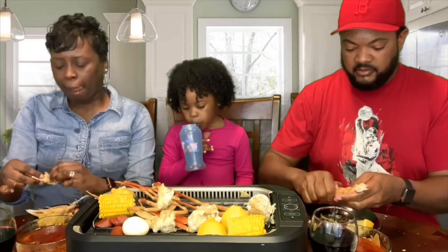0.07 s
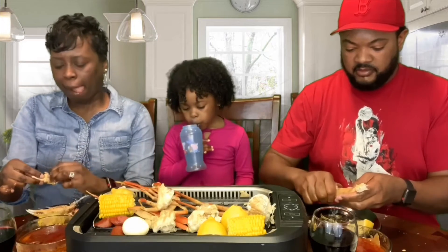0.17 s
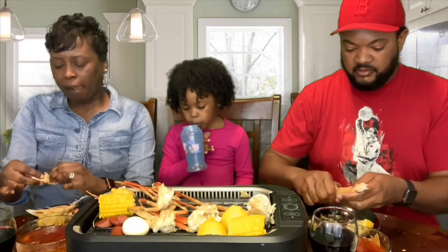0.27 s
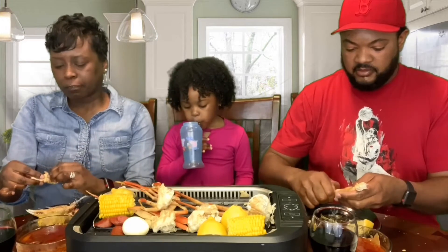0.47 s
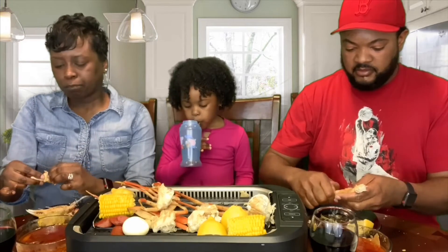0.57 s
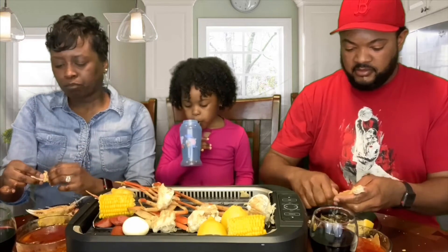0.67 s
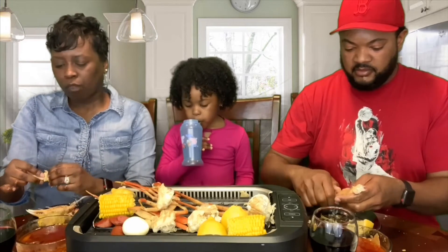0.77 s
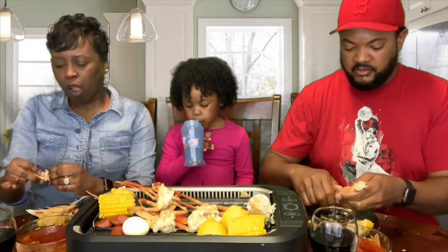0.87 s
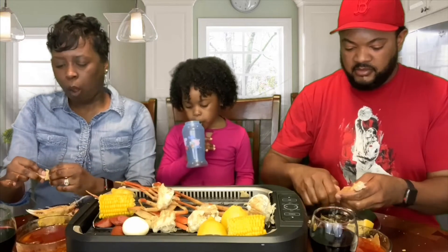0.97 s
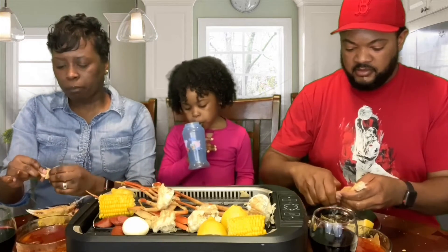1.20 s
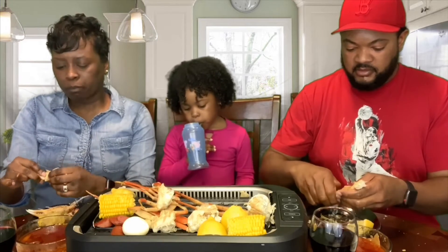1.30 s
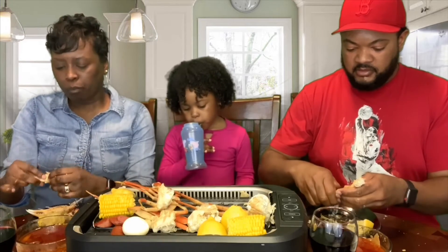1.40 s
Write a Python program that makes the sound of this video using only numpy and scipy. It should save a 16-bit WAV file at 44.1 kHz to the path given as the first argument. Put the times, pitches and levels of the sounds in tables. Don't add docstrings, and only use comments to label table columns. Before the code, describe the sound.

Crab shell breaking by hand: one loud hollow crunching snap, a lighter dry snap, faint rubbing, then drink bubbles and a shell scrap clinking on a tray, over low ventilation hum in a reflective room, microphone nearby.

```python
import sys
import numpy as np
from scipy import signal
from scipy.fft import rfft, irfft, next_fast_len
from scipy.io import wavfile
from scipy.ndimage import map_coordinates

SR = 44100
rng = np.random.default_rng(int(sys.argv[2]) if len(sys.argv) > 2 else 0)


def generate_wav(sig):
    pcm = np.round(np.clip(np.atleast_2d(sig).T, -1, 1) * 32767).astype(np.int16)
    wavfile.write(sys.argv[1], SR, pcm)


def voltage_ratio(decibels):
    exponent = np.asarray(decibels, float) / 20
    return 10 ** exponent


N = 63945
LEAD = 8820


def unit(x):
    return x / np.sqrt(np.mean(x ** 2) + 1e-20)


def along(points, hz):
    f, value = np.transpose(points)
    return np.interp(np.log(hz + 1), np.log(f + 1), value)


def filtered(x, response):
    m = next_fast_len(len(x) + SR // 2)
    spectrum = rfft(x, m) * response(np.fft.rfftfreq(m, 1 / SR))
    return irfft(spectrum, m)[:len(x)]


def band(f, low_hz, top_hz):
    return (1j * f / (low_hz + 1j * f) * top_hz / (top_hz + 1j * f)) ** 2


def resonance(f, hz, width_hz):
    return 1j * f * width_hz / (hz * hz - f * f + 1j * f * width_hz)


def silence():
    return np.zeros(N + LEAD)


def seconds(length_s):
    return np.arange(int(SR * length_s)) / SR


def add(track, s, piece):
    part = track[LEAD + round(s * SR):][:len(piece)]
    part += piece[:len(part)]


def wobble(rate):
    knots = rng.standard_normal(int(N * rate / SR) + 4)
    return map_coordinates(knots, [np.arange(N) * rate / SR])


def drone(spectrum, db, sway_db):
    noise = filtered(rng.standard_normal(N), lambda hz: voltage_ratio(along(spectrum, hz)))
    return voltage_ratio(db + sway_db * wobble(10)) * unit(noise)


# (frequency [Hz], density [dB per Hz])
HUM_SPECTRUM = [(20, -44.5), (40, -5.5), (90, -3), (180, -5), (220, -9.5), (320, -6.5), (450, -11),
                (700, -22), (1500, -120)]
# (frequency [Hz], density [dB per Hz])
HISS_SPECTRUM = [(500, -6.5), (1600, -6), (2200, -12), (4500, -14), (7500, -24.5), (8500, -33),
                 (14500, -35.5), (16000, -52.5)]


def ventilation():
    return drone(HUM_SPECTRUM, -55, 0.97) + drone(HISS_SPECTRUM, -67, 1.0)


# (frequency [Hz], t60 [s])
ROOM_DECAY = [(300, .3), (800, 0.61), (2000, 0.43), (3500, 0.44), (6000, 0.46), (14000, 0.24)]
# (frequency [Hz], level [dB])
ROOM_COLOUR = [(300, -17.5), (1000, 2.5), (2600, 0.5), (3200, 5.5), (3800, 1), (5500, 1.5), (9000, 5),
               (15000, 8.5)]


def kitchen(x):
    late_db, early_db, early_t60_s, gap_s = -5, -5, 0.078, .004
    hz, t, z = signal.stft(rng.standard_normal((2, SR)), SR, nperseg=128)
    late_level_db = along(ROOM_COLOUR, hz)[:, None] - 60 * t / along(ROOM_DECAY, hz)[:, None]
    late = signal.istft(z[0] * voltage_ratio(late_level_db), SR, nperseg=128)[1]
    early = signal.istft(z[1] * voltage_ratio(-60 * t / early_t60_s), SR, nperseg=128)[1]
    tail = voltage_ratio(late_db) * late / np.linalg.norm(late) + voltage_ratio(early_db) * early / np.linalg.norm(early)
    tail = tail * (1 - np.exp(-(np.arange(len(tail)) / SR / gap_s) ** 2))
    return signal.fftconvolve(x, tail)[:len(x)]


def snaps(times, breaks, modes, low_hz, top_hz):
    send_db, splinter_send_db = -0.5, 6.5
    splinter_t60_s = .005
    knocks, splinters, wall_knocks, wall_splinters = silence(), silence(), silence(), silence()
    t, click = seconds(.02), np.array([10.])
    for s, (db, splinter_db) in zip(times, breaks):
        add(knocks, s, voltage_ratio(db) * click)
        burst = voltage_ratio(splinter_db + 21.5 - 60 * t / splinter_t60_s) * rng.standard_normal(len(t))
        add(splinters, s, burst)
        blow_s = round(s, ndigits=2)
        add(wall_knocks, blow_s, voltage_ratio(db + send_db) * click)
        add(wall_splinters, blow_s, voltage_ratio(splinter_db + send_db + splinter_send_db) * click)

    def shell(f):
        ring = sum((-1) ** k * voltage_ratio(db) * resonance(f, hz, width) for k, (hz, width, db) in enumerate(modes))
        return ring * band(f, low_hz, top_hz)

    def bright(f):
        return band(f, 5000, 13000)

    direct = filtered(knocks, shell) + filtered(splinters, bright)
    return direct + kitchen(filtered(wall_knocks, shell)) + kitchen(filtered(wall_splinters, bright))


# (frequency [Hz], width [Hz], level [dB])
LEG_MODES = [(465, 356, 12.5), (972, 310, -0.5), (1224, 250, -4.5), (1900, 580, 10), (3250, 390, 16.5),
             (4386, 170, 9), (5446, 470, 9.5), (7530, 520, 0.5)]
LEG_TIMES = [
    -.07,
    .2184,
    .2195,
    .2200,
    .2206,
    .2222,
    .318,
]
# (knock level [dB], splinter level [dB])
LEG_LEVELS = [(-31.5, -44.5), (-47, -57.5), (-45, -46), (-34.5, -35), (-23.5, -32), (-35, -53.5),
              (-48, -58)]


def leg_snap():
    return snaps(LEG_TIMES, LEG_LEVELS, LEG_MODES, low_hz=250.5, top_hz=9000)


# (time [s], level [dB], frequency [Hz], length [cycles])
TICK_EVENTS = [(.196, -52, 1710, 5.8), (0.196, -60, 3740, 16), (0.2142, -49, 4400, 6.3),
               (0.606, -46.5, 8800, 3), (0.6256, -60, 5000, 2.2), (0.626, -63, 13000, 6),
               (.882, -66.5, 13200, 10.6), (1.166, -61, 14500, 4.5), (1.18, -82, 15500, 23),
               (1.221, -60, 1506, 7.6), (1.4115, -53.5, 9000, 4.8)]


def ticks():
    out, t = silence(), seconds(.05)
    for s, db, hz, cycles in TICK_EVENTS:
        u = 4 * t * hz / cycles
        envelope = 2 * u ** 2 * np.exp(-u)
        add(out, s, voltage_ratio(db) * envelope * np.sin(2 * np.pi * hz * t))
    return out


# (time [s], length [s], level [dB], centre [Hz])
RUB_EVENTS = [
    (.545, .045, -74, 2200),
    (.425, .04, -82, 9000),
    (1.29, .08, -80, 5000),
    (.632, .01, -68, 4000),
    (1.26, .14, -69, 900),
    (.604, .04, -78, 11000),
    (.3, .06, -74, 12000),
]


def rubs():
    out, t = silence(), seconds(.25)
    for s, length, db, hz in RUB_EVENTS:
        grains = rng.standard_normal(len(t)) * rng.exponential(size=len(t))
        grains = unit(filtered(grains, lambda f: resonance(f, hz, hz) ** 2))
        swell = np.sin(np.pi * np.clip(t / length, 0, 1)) ** 2
        add(out, s, voltage_ratio(db) * grains * swell)
    return out


# (frequency [Hz], width [Hz], level [dB])
PIECE_MODES = [(1480, 900, -0.5), (3420, 630, 10), (4710, 1300, 7), (7160, 980, 7), (9230, 2600, -5)]
PIECE_TIMES = [
    .6413,
    .6440,
    .6478,
    .652,
]
# (knock level [dB], splinter level [dB])
PIECE_LEVELS = [(-35, -76), (-40, -70), (-44, -72), (-55, -72)]


def piece_snap():
    return snaps(PIECE_TIMES, PIECE_LEVELS, PIECE_MODES, low_hz=2550, top_hz=6000)


# (time [s], length [s], start [Hz], end [Hz])
BUBBLES = [
    (1.276, .04, 415, 445),
    (1.317, .026, 420, 440),
    (1.313, .016, 1480, 1470),
    (1.361, .022, 2050, 1380),
    (1.39, .009, 1600, 1450),
    (1.424, .012, 330, 200),
]
BUBBLE_LEVELS = [-40.5, -40.5, -58, -55, -57, -48]


def glugs():
    glide_s, swell_s, close_s = .014, .003, .003
    fade_db_per_s, flutter_db = 260, 1.8
    out, t = silence(), seconds(.1)
    for (s, length, start_hz, end_hz), db in zip(BUBBLES, BUBBLE_LEVELS):
        hz = end_hz + (start_hz - end_hz) * np.exp(-t / glide_s)
        shape = (1 - np.exp(-t / swell_s)) * np.exp(-np.maximum(t - length, 0) / close_s)
        level_db = db - fade_db_per_s * t + flutter_db * wobble(144)[:len(t)]
        add(out, s, voltage_ratio(level_db) * shape * np.sin(2 * np.pi * np.cumsum(hz) / SR))
    return out


# (time [s], level [dB])
TRAY_CONTACTS = [
    (1.4160, -60),
    (1.4180, -48),
    (1.4205, -70.5),
    (1.4265, -55.5),
]
# (frequency [Hz], level [dB], t60 [s])
TRAY_MODES = [(1470, -7, .035), (1850, -6, .025), (2250, -7, .03), (3252, -1, .15), (3973, -1, .11),
              (7074, -16, .02)]


def clinks():
    scrape_db, scrape_t60_s = 10, 0.048
    out, scrape, t = silence(), silence(), seconds(.2)
    for s, db in TRAY_CONTACTS:
        ring = np.zeros(len(t))
        for hz, mode_db, t60 in TRAY_MODES:
            struck_db = mode_db + rng.normal(0, 2)
            ring += voltage_ratio(struck_db - 60 * t / t60) * np.sin(2 * np.pi * hz * t)
        add(out, s, voltage_ratio(db) * ring * (1 - np.exp(-t / 0.0002)))
        grit = voltage_ratio(db + scrape_db - 60 * t / scrape_t60_s) * rng.standard_normal(len(t))
        add(scrape, s, grit)
    return out + filtered(scrape, lambda f: band(f, 630, 4040) * 11000 / (11000 + 1j * f))


def scene():
    shells = leg_snap() + piece_snap()
    hands, cup, tray = ticks(), glugs(), clinks() + rubs()
    close = hands + cup + tray
    room = voltage_ratio(1) * kitchen(hands) + voltage_ratio(-6.5) * kitchen(cup) + kitchen(tray)
    return ((shells + close + room)[LEAD:] + ventilation())[None]


def roll_off(x):
    return signal.sosfilt(signal.butter(12, 16520, fs=SR, output="sos"), x)


def record(dry):
    mix = filtered(dry[0], lambda hz: 1 / (1 + (hz / 15700) ** 60))[None]
    return roll_off(mix)


dry = scene()
out = record(dry)
generate_wav(out)
```